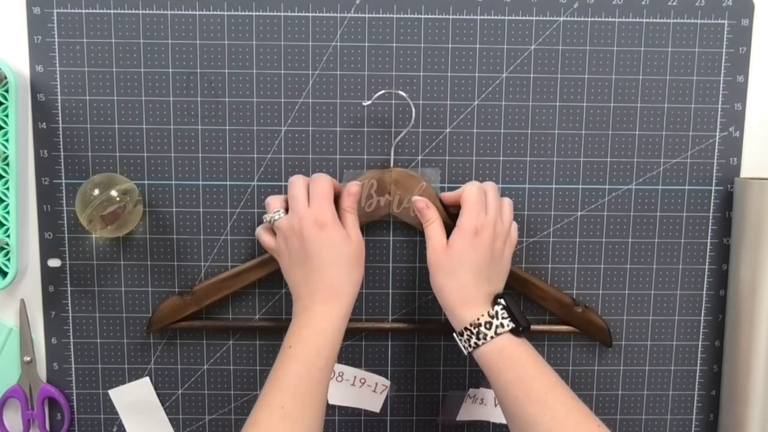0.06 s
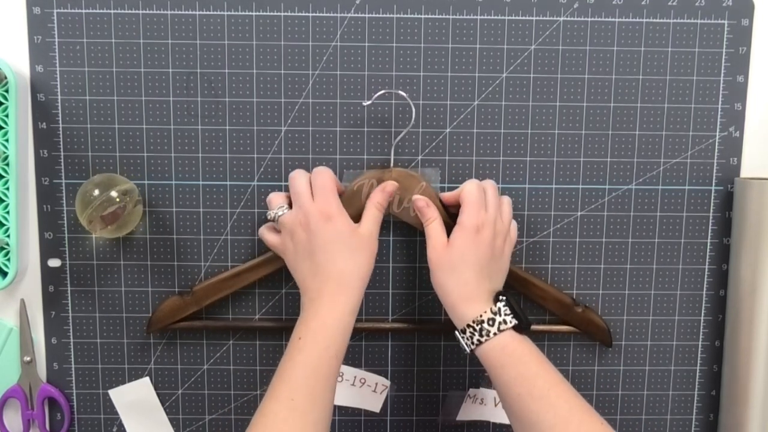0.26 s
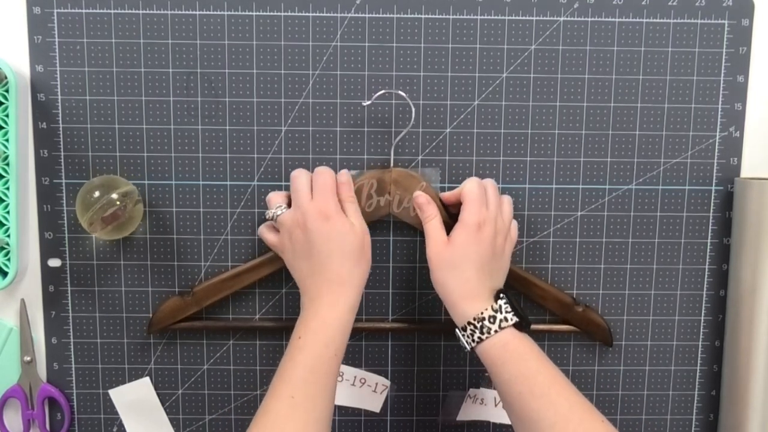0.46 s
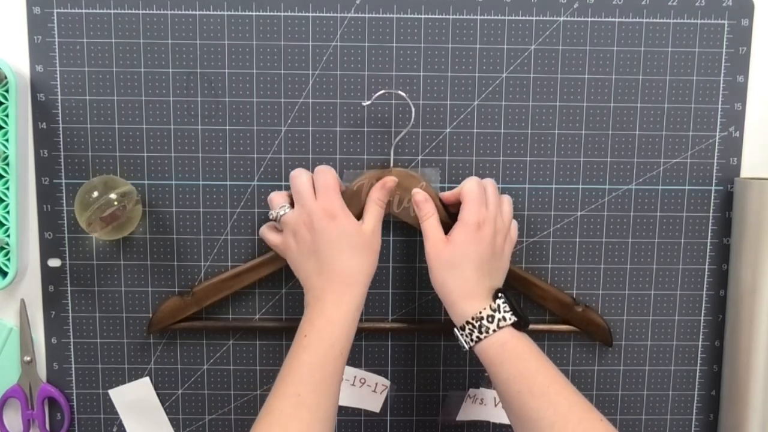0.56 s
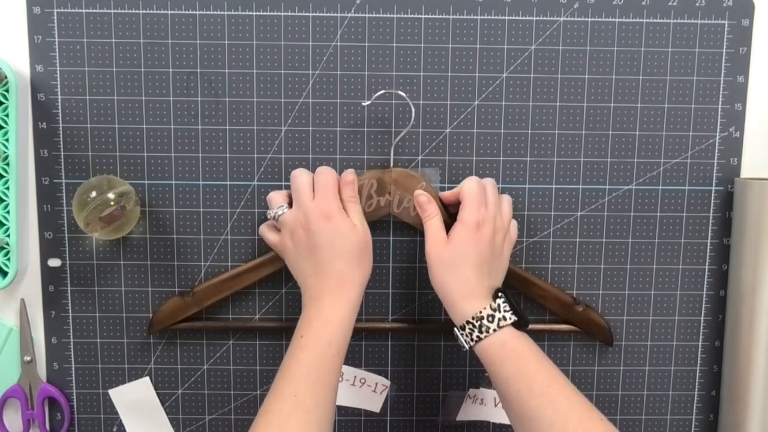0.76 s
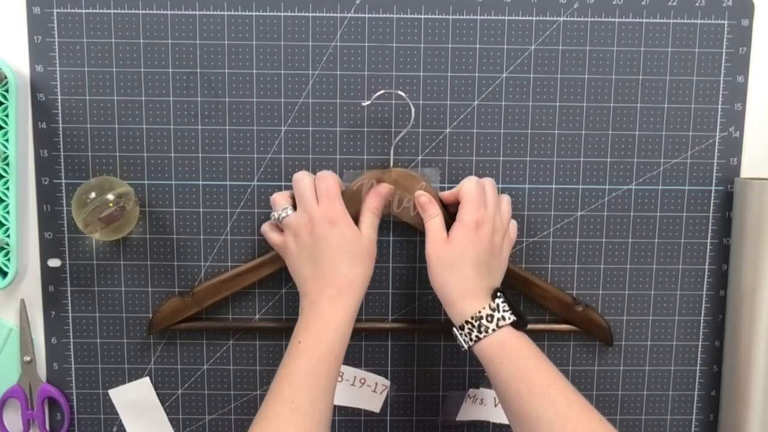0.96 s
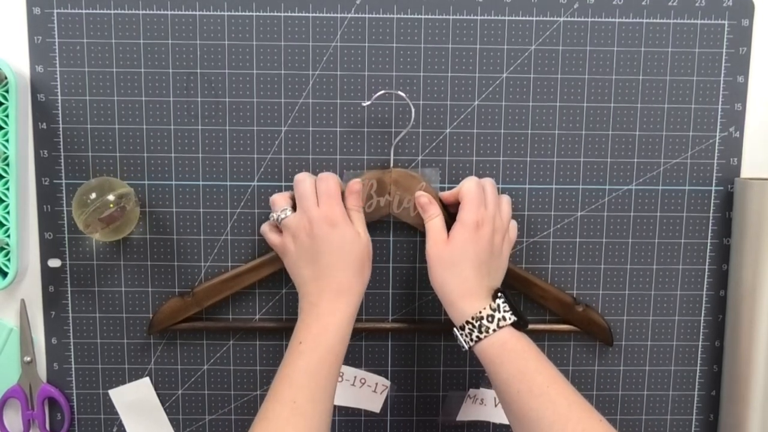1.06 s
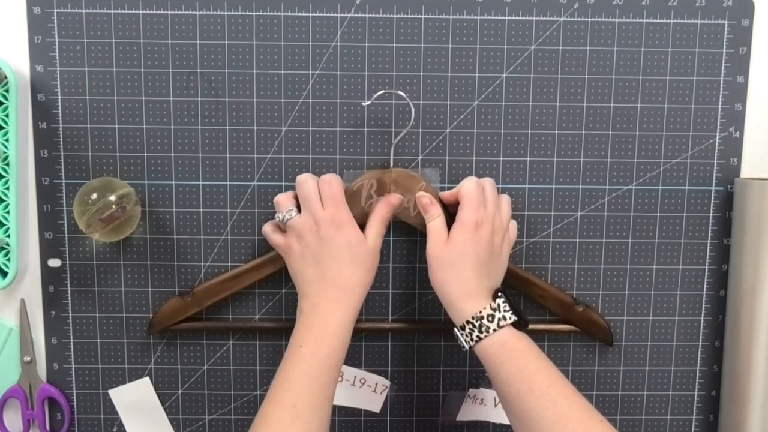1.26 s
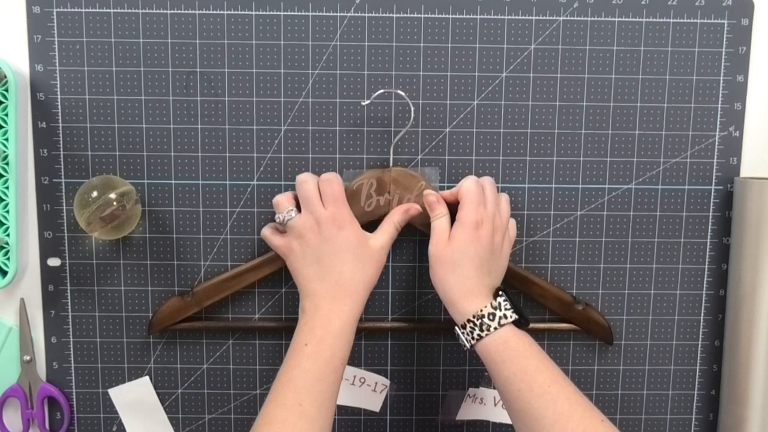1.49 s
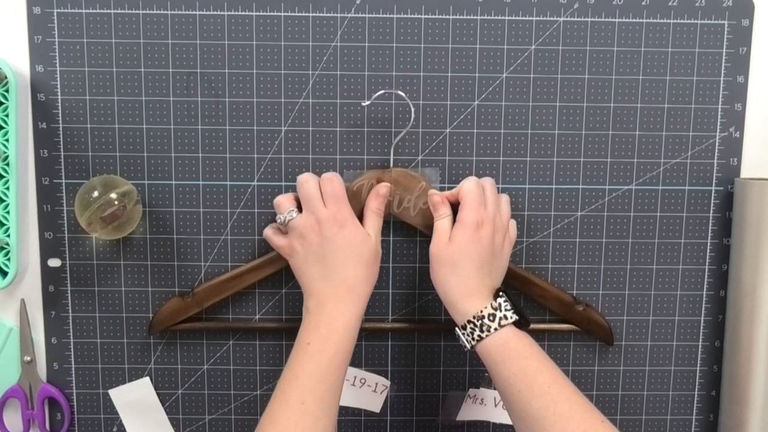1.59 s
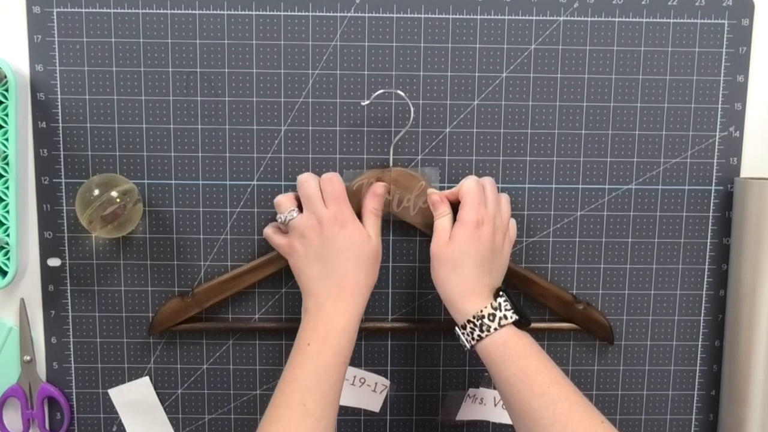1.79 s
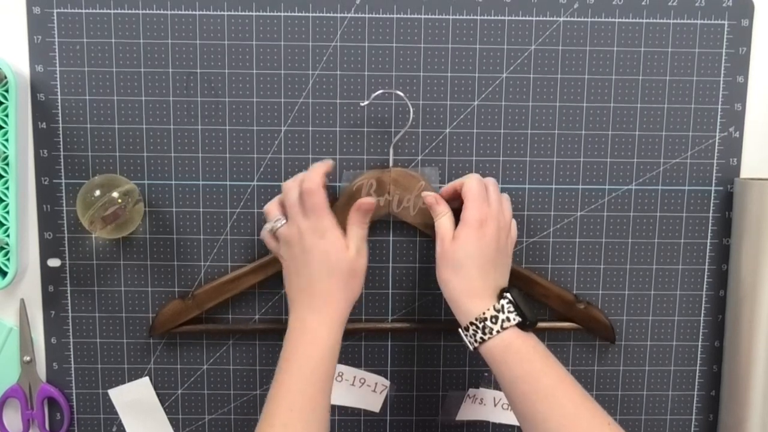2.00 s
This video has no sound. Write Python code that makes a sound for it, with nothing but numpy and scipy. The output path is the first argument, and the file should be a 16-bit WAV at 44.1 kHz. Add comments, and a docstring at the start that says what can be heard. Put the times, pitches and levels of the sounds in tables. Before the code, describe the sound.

Thumbs rub sticky film onto a wooden hanger in short hissing strokes, with irregular scratchy drags, small crisp ticks and a few dull table knocks; close microphone in a quiet, dry room with a faint low hush.

```python
"""Thumbs rub a strip of transfer tape onto a wooden coat hanger on a cutting mat, under a phone on a stand.
Skin hisses over the film as shaped noise and squeaks as thin arched tones; ticks are noise bursts with a
ringing sine. Stick and slip is snagged noise that scrapes the tape and shakes hanger and table.
Knocks ring mat, table and stand as damped modes; a short tail and a steady hush make the room."""
import sys
import numpy as np
from scipy import signal
from scipy.fft import rfft, irfft
from scipy.io import wavfile
from scipy.ndimage import uniform_filter1d

SR = 44100
rng = np.random.default_rng(int(sys.argv[2]) if len(sys.argv) > 2 else 0)


def inscribe(sig):
    """Save sig as 16-bit PCM at rate SR to the path in sys.argv[1].

    A 1-D sig is mono; a 2-D sig holds one channel per row.
    Samples are clipped to [-1, 1] before scaling.
    """
    pcm = np.round(np.clip(np.atleast_2d(sig).T, -1, 1) * 32767)
    wavfile.write(sys.argv[1], SR, pcm.astype(np.int16))


def linear_from_db(decibels):
    """Turn decibels (scalar or array-like) into linear amplitude factors; 0 gives 1."""
    return 10 ** (np.asarray(decibels, float) / 20)


N = 89964
T = np.arange(N) / SR


def level(x, db):
    """Scale to an rms level."""
    return x * linear_from_db(db) / np.sqrt(np.mean(x ** 2))


def colour(x, points):
    """Filter by (frequency [Hz], gain [dB]) points on a log axis."""
    hz, db = np.array(points, float).T
    f = np.maximum(np.arange(len(x) // 2 + 1) * SR / len(x), 1)
    gain_db = np.interp(np.log(f), np.log(hz), db, left=-80, right=-80)
    return irfft(rfft(x) * linear_from_db(gain_db), len(x))


def ring(x, modes):
    """Damped resonances; a unit impulse rings each at its dB."""
    out = 0
    for hz, db, t60_s in modes:
        pole = np.exp(2j * np.pi * hz / SR - np.log(1000) / (t60_s * SR))
        out = out + linear_from_db(db) * signal.lfilter([1], [1, -pole], x).imag
    return out


def grit(rate_hz, spread_db):
    """Noise with random decaying snags of very different size, rms 1."""
    hits = rng.random(N) < rate_hz / SR
    size = np.minimum(rng.exponential(size=N), 2.5)  # capped
    snags = hits * linear_from_db(spread_db * size)
    noise = rng.standard_normal(N)
    decay = np.exp(-1 / (0.0043 * SR))
    return level(noise * (1 + signal.lfilter([1], [1, -decay], snags)), 0)


def pushes(rows, length_s):
    """A smooth push at each (time [s], level [dB]), of unit area at 0 dB."""
    x, shape = np.zeros(N + SR), np.hanning(int(length_s * SR))
    for s, db in rows:
        start = int(s * SR)
        x[start:start + len(shape)] += linear_from_db(db) * shape / shape.sum()
    return x[:N]


# room hush spectrum: (frequency [Hz], relative level [dB])
HUSH_SPECTRUM = [(60, 4), (150, 16.5), (410, -6), (900, -5.5), (3000, -23), (16000, -19)]


def room_hush():
    """Steady noise, strongest in the bass."""
    return level(colour(rng.standard_normal(N), HUSH_SPECTRUM), -49.5)


def room_tail(near):
    """Convolution with decaying, low-passed noise that starts after 3 ms."""
    tail_db, t60_s = -13.5, 0.061
    t = T[:SR // 3]
    tail = rng.standard_normal(len(t)) * linear_from_db(-60 * t / t60_s) * (t > .003)
    tail = signal.lfilter(*signal.butter(1, 4500, fs=SR), tail)
    tail = tail * linear_from_db(tail_db) / np.sqrt(np.sum(tail ** 2))
    return signal.fftconvolve(near, tail)[:N]


# stick and slip on the hanger: (time [s], scrape level [dB], wood rumble drive [dB])
DRAG_TRACK = [(0, -53, -40.5), (.2, -53, -34.5), (.3, -61, -51), (.44, -54, -40), (.47, -47.5, -36.5),
              (.58, -60, -38.5), (.68, -58.5, -51.5), (.78, -71, -38.5), (.93, -52.5, -42), (.98, -55, -53),
              (1.08, -59.5, -43.5), (1.2, -57, -35.5), (1.29, -52.5, -53.5), (1.472, -58, -33.5),
              (1.537, -68, -49.5), (1.58, -45, -42.5), (1.66, -59, -47), (1.69, -44.5, -37),
              (1.77, -67.5, -46), (1.85, -60.5, -49), (1.97, -56.5, -39.5), (2.04, -48.5, -44)]


def drag_db():
    """Interpolates the drag: scrape and rumble tracks in dB."""
    s, scrape_db, rumble_db = np.array(DRAG_TRACK).T
    return np.interp(T, s, scrape_db), np.interp(T, s, rumble_db)


# knocks of the hanger on the table: (time [s], blow drive [dB], stand sway drive [dB])
KNOCK_EVENTS = [(0.3664, -10.5, -22), (0.706, -20, -26), (0.749, -51, -42), (1.016, -13.5, -24),
                (1.186, -35.5, -57), (1.461, -32.5, -37), (1.553, -27.5, -36.5), (1.813, -28, -36)]


def knock_drive(column, length_s, delay_s=0):
    """Differentiated pushes, so each blow swings both ways."""
    rows = [(r[0] + delay_s, r[column]) for r in KNOCK_EVENTS]
    return np.gradient(pushes(rows, length_s)) * length_s * SR / 2


# sway modes of the stand: (frequency [Hz], gain [dB], t60 [s])
STAND_MODES = [(23.7, 0.6, 0.62), (36.34, -2.9, 0.25)]


def stand_sway():
    """Low modes sway after each knock; noise that follows part of the rumble keeps them restless."""
    push_s, stir_db, stir_share = 0.0418, -19.5, 0.35  # share of the rumble's dB
    sway = ring(knock_drive(2, push_s, push_s / 2), STAND_MODES)
    stir = level(ring(rng.standard_normal(N), STAND_MODES), stir_db)
    return sway + linear_from_db(stir_share * drag_db()[1]) * stir


# table-top modes: (frequency [Hz], gain [dB], t60 [s])
TABLE_MODES = [(132.4, -7.5, 0.21), (188.4, -6.5, 0.14), (248.5, -2.5, 0.25), (259.6, 3.5, 0.19)]


def table_ring(x, first_mode=0):
    """Damped modes of the table top, from first_mode up."""
    return ring(x, TABLE_MODES[first_mode:])


# springy mat: one mode (frequency [Hz], gain [dB], t60 [s])
MAT_MODE = (204, -37.5, 0.017)


def knocks():
    """Blows pass through the springy mat into the table top."""
    return table_ring(ring(knock_drive(1, length_s=0.006), [MAT_MODE]))


# wooden hanger modes: (frequency [Hz], gain [dB], t60 [s])
HANGER_MODES = [(449, 4, 0.028), (727, -6.5, 0.022), (946, -15.5, 0.016), (1122, -9, 0.014),
                (1346, -12.5, 0.045), (3250, -11.5, 0.012)]


def hanger_ring(x):
    """Damped modes of the hanger."""
    return ring(x, HANGER_MODES)


# scrape spectrum: (frequency [Hz], relative level [dB])
SCRAPE_SPECTRUM = [(1400, -9.5), (2000, -3.5), (2850, 2.5), (4200, -10), (5200, -2.5), (9000, -27.5)]


def drag():
    """Stick and slip scrapes the tape and shakes hanger and table."""
    scrape_db, rumble_db = drag_db()
    hanger = level(hanger_ring(grit(120, 2.7)), -6.5)
    table = level(table_ring(np.gradient(rng.standard_normal(N)), first_mode=1), -2.77)
    scrape = level(colour(grit(200, 3.7), SCRAPE_SPECTRUM), 0)
    return linear_from_db(scrape_db) * scrape + linear_from_db(rumble_db) * (hanger + table)


# skin squeaks: (start [s], length [s], top pitch [Hz], sag at the ends [Hz], peak level [dB])
SQUEAK_EVENTS = [(0.048, 0.1, 6000, 590, -49.5), (0.155, 0.046, 5210, 63, -57),
                 (.376, .055, 5400, 110, -57.5), (0.432, 0.075, 5450, 245, -54),
                 (0.573, 0.014, 1375, 9.8, -41.5), (1.969, 0.01, 1370, 30, -46),
                 (2.007, 0.012, 2200, 131, -40)]


def squeaks():
    """Thin arched whistles of skin on film, with a wavering pitch."""
    out = np.zeros(N)
    for s, length_s, top_hz, sag_hz, db in SQUEAK_EVENTS:
        u = np.clip((T - s) / length_s, 0, 1)
        waver_hz = uniform_filter1d(rng.standard_normal(N), 400) * top_hz / 10
        pitch_hz = top_hz - sag_hz * (2 * u - 1) ** 2 + waver_hz
        env = np.sqrt(np.sin(np.pi * u) + 1e-12)
        out += linear_from_db(db) * env * np.sin(2 * np.pi * np.cumsum(pitch_hz) / SR)
    return out


# ticks of tape and hanger: (time [s], peak level [dB], centre [Hz], hanger drive [dB])
TICK_EVENTS = [(0.084, -38, 2720, -36.5), (0.1887, -12.5, 12960, -74), (0.1899, -18.5, 6660, -47),
               (.2447, -31.5, 3080, -39.5), (0.3415, -35.5, 4400, -28.5), (0.3665, -31, 9700, -33.5),
               (.459, -39.5, 3340, -56), (.5197, -36.5, 3100, -57), (0.5572, -34.5, 3280, -43.5),
               (0.705, -45, 3850, -69), (0.7538, -16, 4920, -24), (0.8942, -37, 2400, -37.5),
               (1.0186, -23.5, 4180, -76), (1.026, -44.5, 4900, -32.5), (1.185, -32.5, 2980, -44.5),
               (1.201, -42, 3240, -46), (1.3468, -38.5, 2620, -61), (1.4509, -29.5, 2730, -34.5),
               (1.5537, -39, 3000, -40.5), (1.5879, -16, 4820, -59), (1.607, -32, 1290, -62),
               (1.6411, -33.5, 3250, -45), (1.6787, -39, 3420, -40), (1.8146, -32, 3480, -35.5),
               (1.8891, -43.5, 3100, -64), (1.964, -35, 2800, -68), (1.9805, -47, 2110, -35),
               (1.9931, -26.5, 2526, -35)]


def ticks():
    """Noise bursts with a clean ring at a centre pitch; each rings the hanger, which bounces once on the mat."""
    burst_q, burst_t60_cycles = 1.05, 31
    snap_db, snap_t60_cycles = 1, 15.6  # clean ring, against the burst
    bounce_delay_s, bounce_db = 0.005646, 2.5
    out, t = np.zeros(N + SR), np.arange(int(.06 * SR)) / SR
    rise = np.minimum(t / 0.00022, 1)
    noise = rng.standard_normal((len(TICK_EVENTS), len(t)))
    for (s, db, hz, _), n in zip(TICK_EVENTS, noise):
        burst = n * rise * linear_from_db(-60 * t * hz / burst_t60_cycles)
        burst = signal.lfilter(*signal.iirpeak(hz, burst_q, SR), burst)
        band_hz = [hz / 2, min(1.47 * hz, SR / 2.2)]
        burst = signal.lfilter(*signal.butter(2, band_hz, "band", fs=SR), burst)
        snap = rise * linear_from_db(snap_db - 60 * t * hz / snap_t60_cycles) * np.sin(2 * np.pi * hz * t)
        tick = burst / np.abs(burst).max() + snap
        start = int(s * SR)
        out[start:start + len(t)] += linear_from_db(db) * tick / np.abs(tick).max()
    hit = 6 * np.gradient(pushes([(r[0], r[3]) for r in TICK_EVENTS], 0.0001))
    bounce = pushes([(r[0] + bounce_delay_s, r[3] + bounce_db) for r in TICK_EVENTS], 0.00072)
    return out[:N] + hanger_ring(hit + bounce)


# thumb strokes, levels before smoothing: (start [s], end [s], hiss at start [dB], hiss at end [dB])
STROKE_EVENTS = [(0.047, 0.244, -56, -56.5), (0.423, 0.58, -54, -52.5), (0.634, 0.64, -41, -50.5),
                 (0.771, 0.895, -51, -58.5), (1.066, 1.173, -56.5, -53.5), (1.24, 1.307, -61, -47),
                 (1.371, 1.469, -52.5, -53), (1.555, 1.597, -54, -42.5), (1.678, 1.741, -45, -59),
                 (1.804, 1.837, -51, -56.5), (1.889, 1.96, -54.5, -56)]
# film hiss spectrum: (frequency [Hz], relative level [dB])
FILM_SPECTRUM = [(3500, -3), (5300, 1), (7000, -1.5), (8600, 0.5), (9300, -7), (10000, -1), (11300, -7),
                 (13200, -2), (15800, -15)]


def strokes():
    """Skin hisses over the film while a thumb slides: quick start, slower fade."""
    fade_s = 0.017
    env = 0
    for start, end, db0, db1 in STROKE_EVENTS:
        env = env + (T > start) * (T < end) * linear_from_db(np.interp(T, [start, end], [db0, db1]))
    fade = np.exp(-1 / (fade_s * SR))
    lagging = signal.lfilter([1 - fade], [1, -fade], env)
    env = uniform_filter1d(np.maximum(env, lagging), SR // 100)
    return env * level(colour(rng.standard_normal(N), FILM_SPECTRUM), 0)


def scene():
    """All sources and the hush; hiss, drag, ticks and squeaks also feed the room tail."""
    near = strokes() + drag() + ticks() + squeaks()
    mix = near + room_tail(near) + knocks() + stand_sway() + room_hush()
    return mix[None]


def top_cut(x):
    """Nothing passes above the cut-off."""
    return signal.sosfilt(signal.butter(12, 17000, fs=SR, output="sos"), x)


def record(dry):
    """The finished mix as the phone keeps it."""
    return top_cut(dry)


dry = scene()
out = record(dry)
inscribe(out)
```